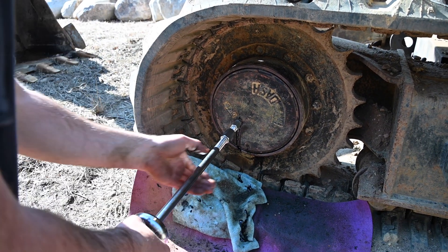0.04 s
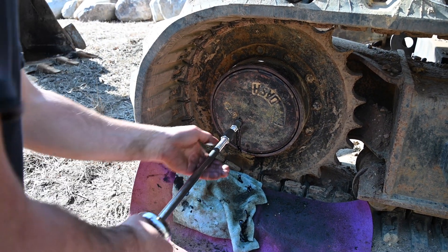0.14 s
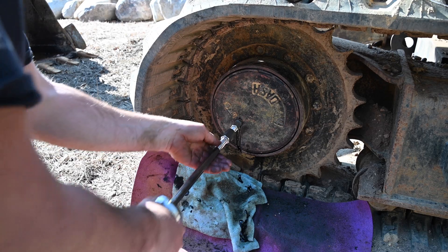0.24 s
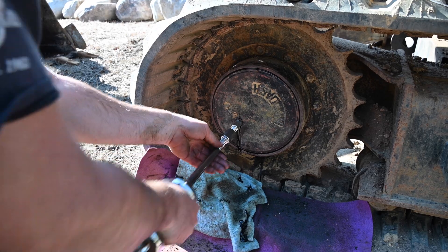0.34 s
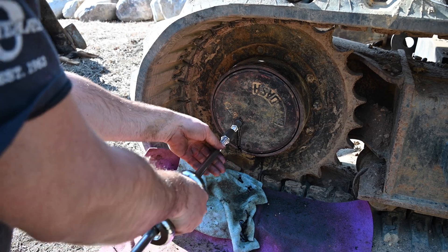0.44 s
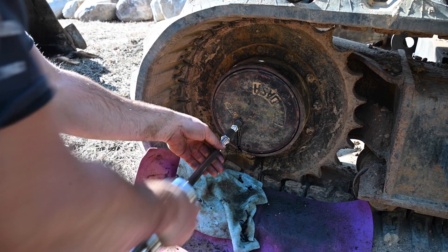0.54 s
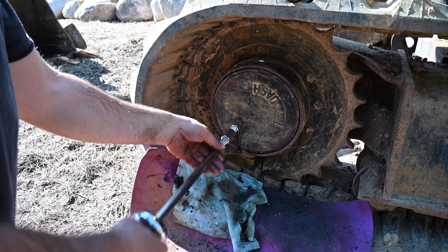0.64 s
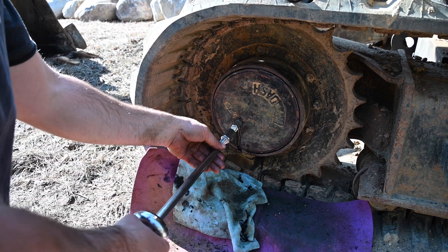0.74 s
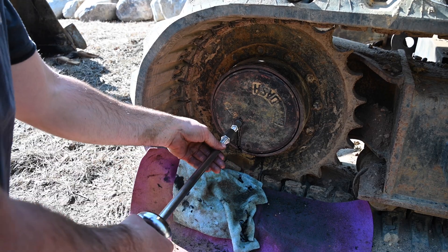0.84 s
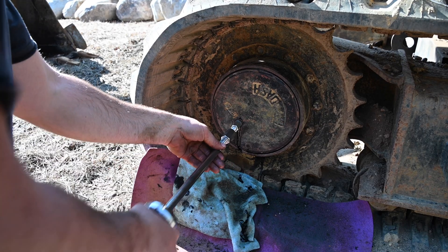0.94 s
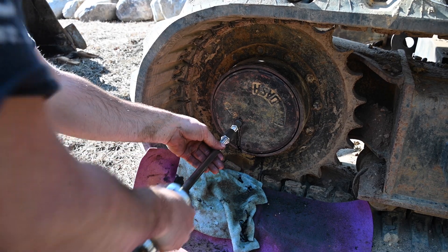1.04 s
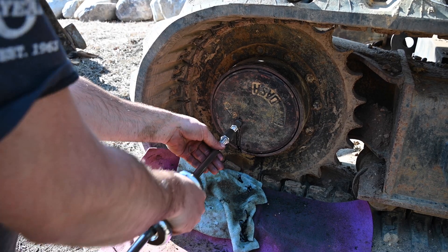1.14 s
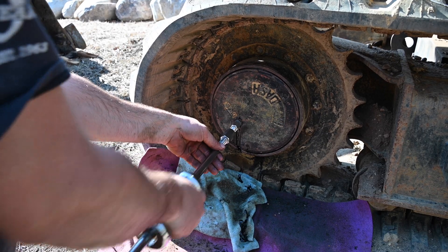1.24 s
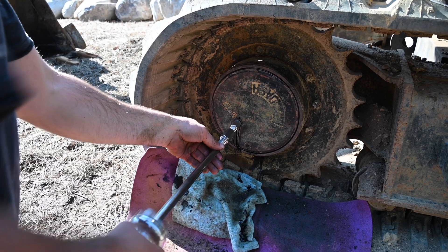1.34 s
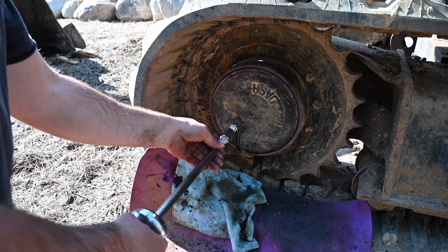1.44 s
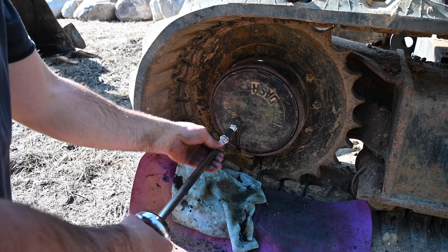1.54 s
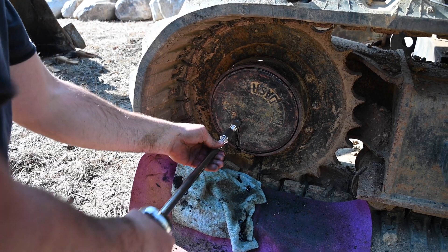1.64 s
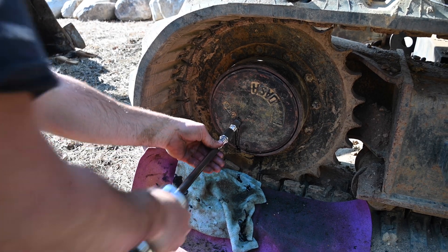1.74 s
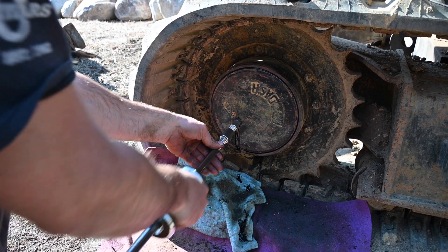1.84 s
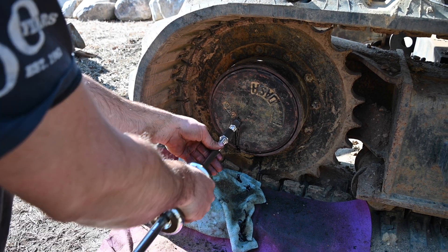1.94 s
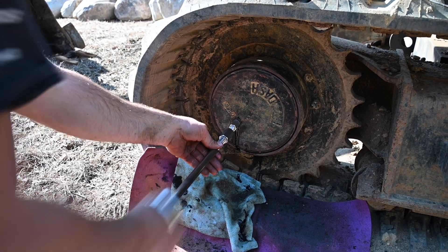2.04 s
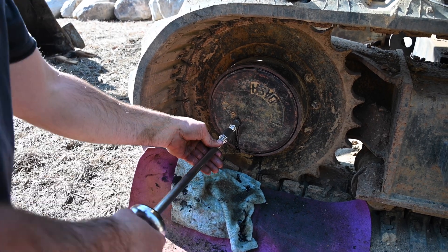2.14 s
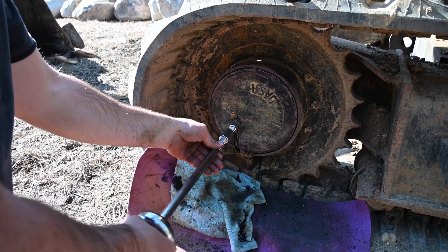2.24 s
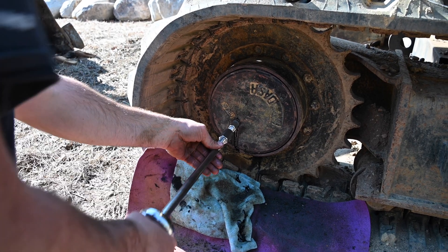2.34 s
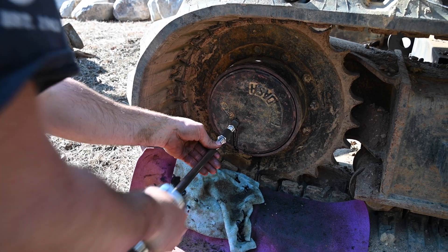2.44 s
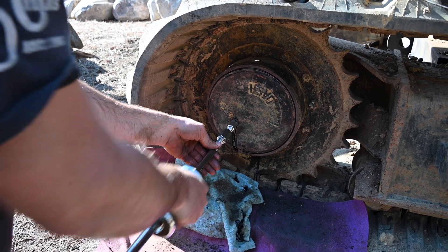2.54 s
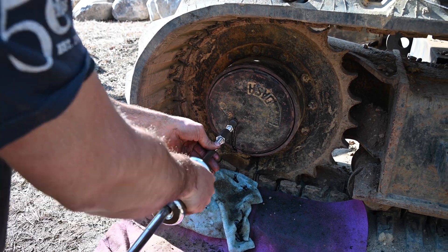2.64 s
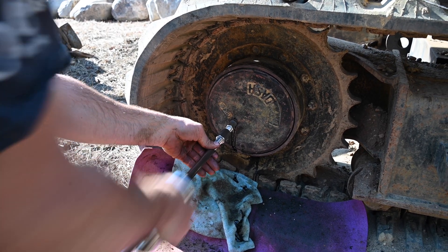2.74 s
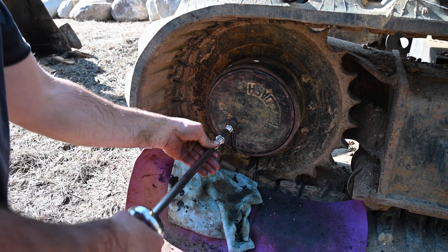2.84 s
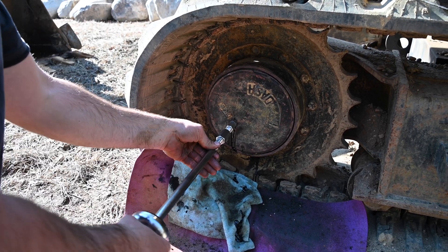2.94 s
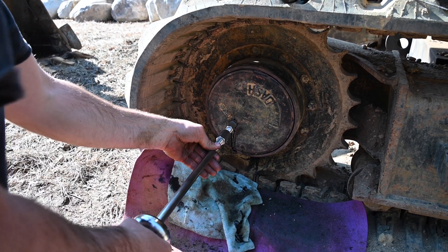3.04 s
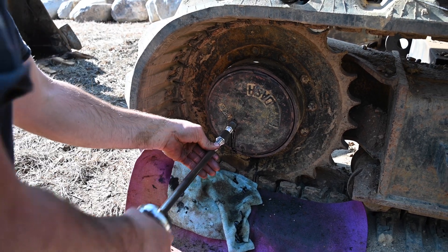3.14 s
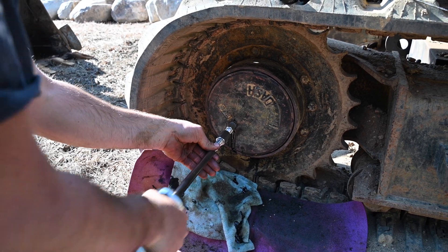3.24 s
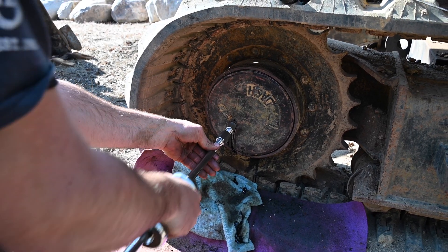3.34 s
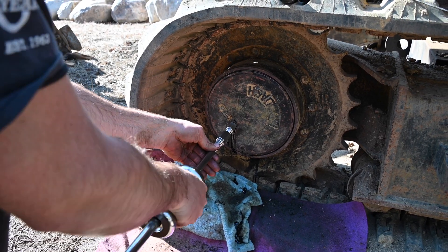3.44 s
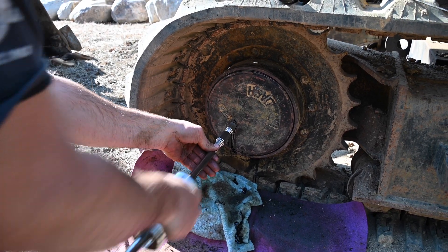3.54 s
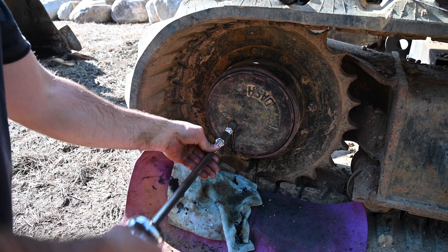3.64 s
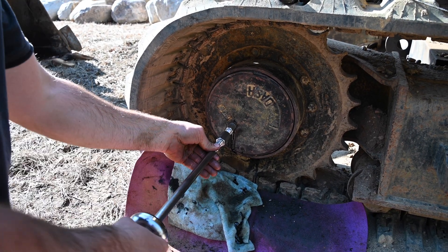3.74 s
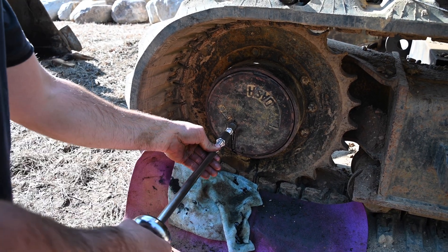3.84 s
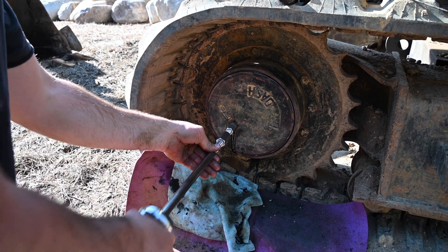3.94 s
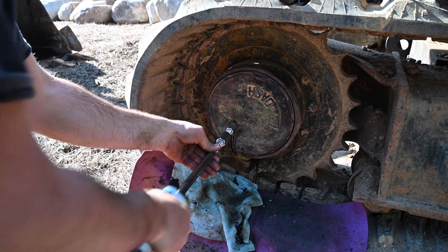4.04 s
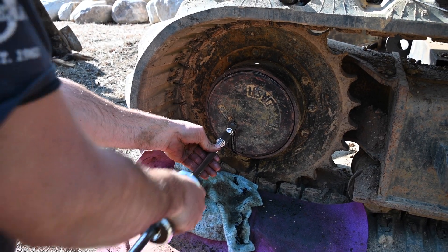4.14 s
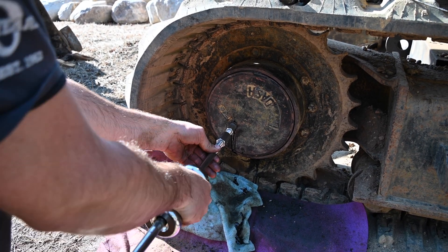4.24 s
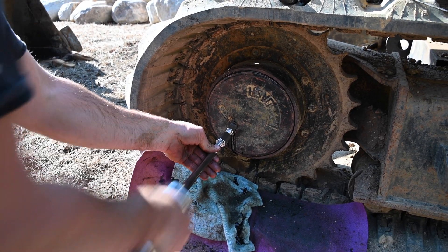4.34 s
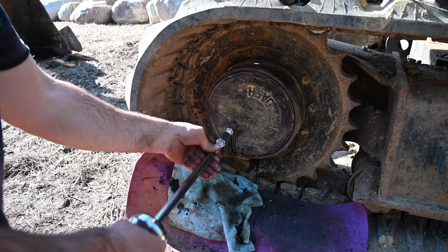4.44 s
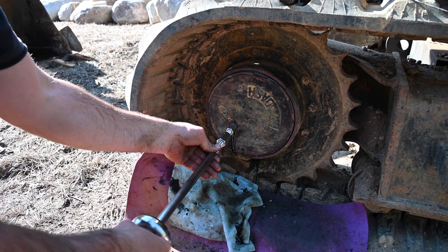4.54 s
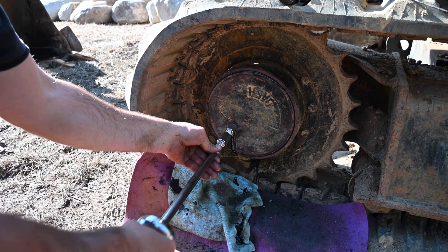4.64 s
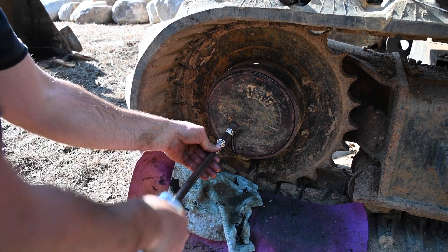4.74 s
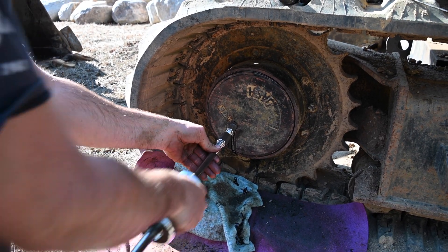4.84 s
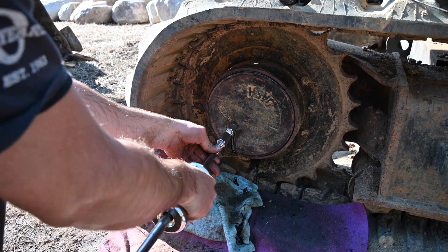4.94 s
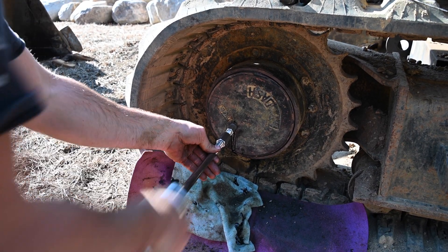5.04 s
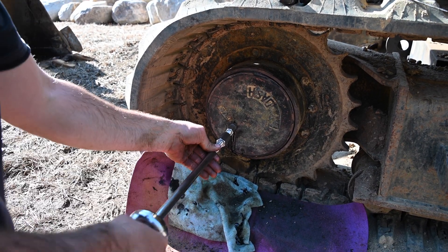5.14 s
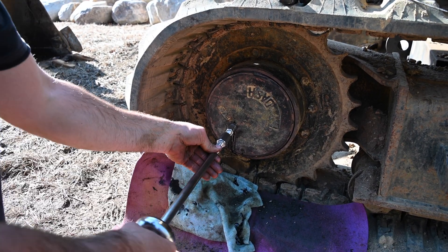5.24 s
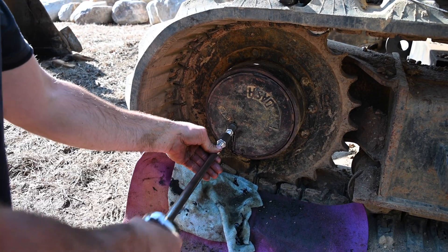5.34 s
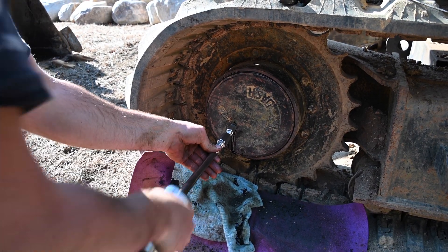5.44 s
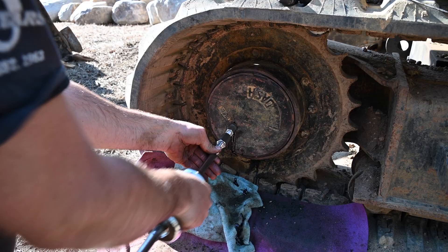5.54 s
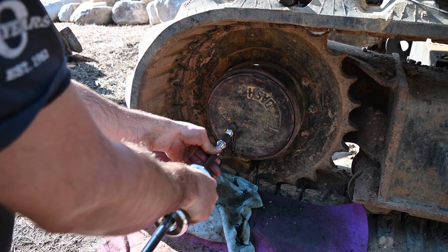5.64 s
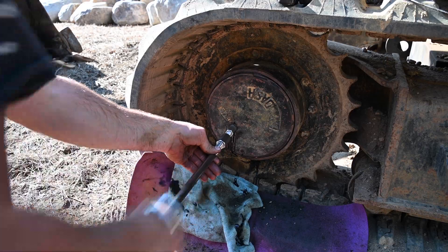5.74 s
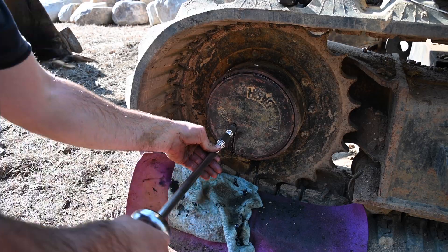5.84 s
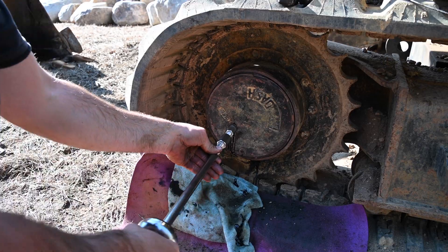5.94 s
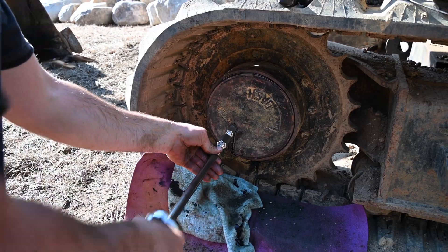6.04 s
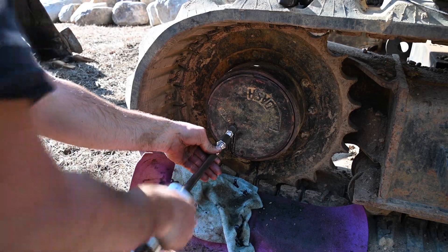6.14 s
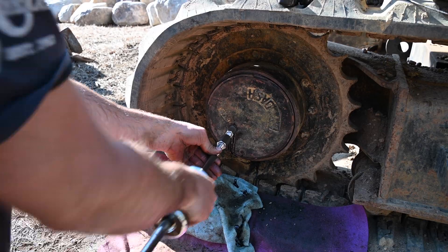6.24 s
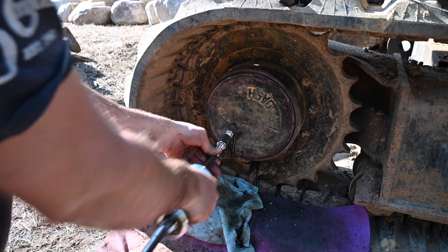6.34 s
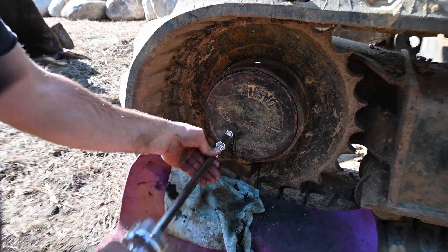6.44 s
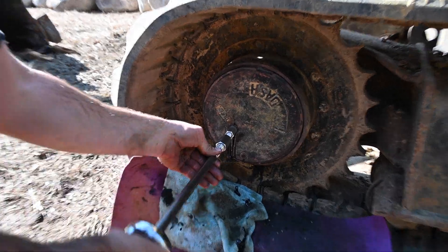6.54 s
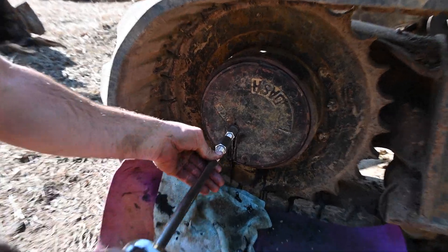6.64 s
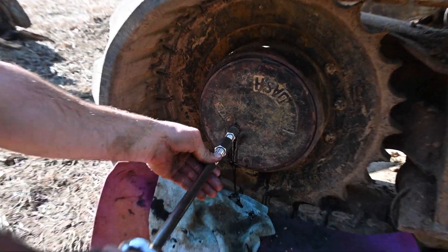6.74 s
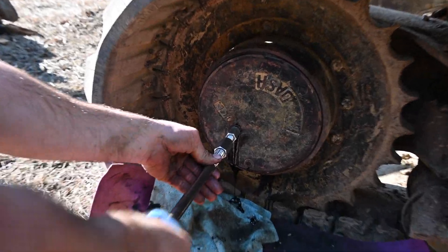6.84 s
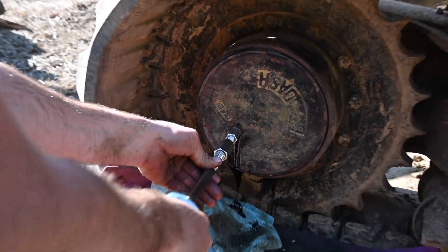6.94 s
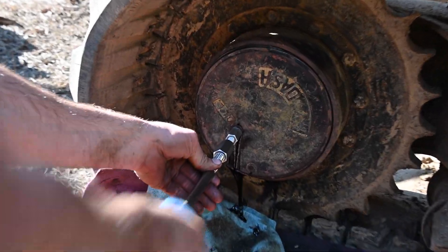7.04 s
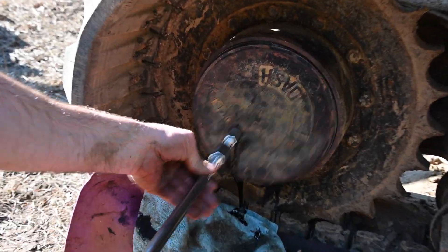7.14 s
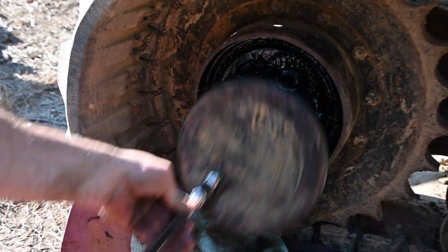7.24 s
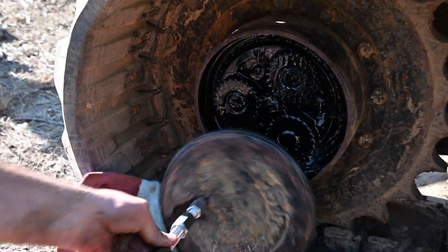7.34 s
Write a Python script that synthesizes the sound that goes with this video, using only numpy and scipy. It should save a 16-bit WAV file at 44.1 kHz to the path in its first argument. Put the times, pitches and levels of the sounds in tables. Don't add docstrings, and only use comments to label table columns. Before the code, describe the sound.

Ten hard metallic clanks about every 0.7 seconds, with sliding scrapes and light ticks between, over faint wind and low yard hum.

```python
import sys
import numpy as np
from scipy import signal
from scipy.fft import rfft, irfft, next_fast_len
from scipy.io import wavfile
from scipy.ndimage import uniform_filter1d, map_coordinates

SR = 44100
rng = np.random.default_rng(int(sys.argv[2]) if len(sys.argv) > 2 else 0)


def unload_wav(signal):
    wavfile.write(
        sys.argv[1],
        SR,
        np.round(np.clip(np.atleast_2d(signal).T, -1, 1) * 32767).astype(np.int16),
    )


def how_loud(loudness_db):
    steps = np.asarray(loudness_db, float) / 20
    return 10 ** steps


N = 326643
T = np.arange(N) / SR

# [start_s, level_db]
WIND = [(0, -44), (.36, -40), (.6, -48), (1.1, -42), (1.44, -51), (1.72, -40.5), (1.866, -33.5),
        (1.96, -41), (2.3, -41), (2.43, -40), (2.82, -47.5), (3.35, -46), (3.6, -44), (4.6, -50),
        (5.9, -48.5), (6.05, -47.5), (6.95, -46), (7.2, -50)]
# [freq_hz, density_db_per_hz]
GUST = [(12, -42.5), (20, -5), (75, 6), (189, -15.5), (259, -7.5), (312, -15.5), (600, -20), (780, -63.5),
        (1320, -120)]
# [freq_hz, density_db_per_hz]
YARD = [(65, -17), (110, 0), (352, -6), (552, -6), (599, -6.5), (766, -4), (2040, -16), (3010, -18),
        (12600, -39), (14500, -75)]
# [freq_hz, correlation_ratio]
ALIKE = [(60, 1), (180, 0.99), (550, 0.91), (1650, 0.5), (4970, 0.064), (15000, 0.33)]
# [freq_hz, level_db]
LEAN = [(250, -0.7), (700, 3.5), (1400, -0.5), (2800, -3), (5600, 1.1), (10000, 1), (15000, 1.5)]
# [freq_hz, phase_rad]
SKEW = [(100, 0.17), (700, 0.099), (1500, 1.1), (3000, 1.25), (6000, 1.81), (12000, 1.9)]
# [start_s, peak_db, low_pitch_hz, high_pitch_hz, brightness_db]
KNOCKS = [(0.0004, -23, 5300, 3600, -5), (.0205, -18, 900, 1800, -20), (0.599, -12, 1886, 5200, -26),
          (0.6387, -21.5, 1600, 3700, -40), (0.6808, -20.5, 2303, 4180, -35),
          (2.1575, -5.5, 1800, 5230, -6), (2.768, -5, 3240, 4800, -4), (2.8807, -6, 1790, 5600, 1),
          (3.055, -23, 2020, 3480, 3.5), (3.099, -23.5, 1530, 3430, 2), (3.269, -16, 1593, 3630, 6),
          (3.342, -12.5, 2280, 3500, -18), (3.3548, -19, 1023, 5530, -14), (3.7175, -8, 4700, 3200, -8),
          (4.161, -29, 2800, 5050, -20), (4.169, -22, 950, 1850, -20), (4.485, -12.5, 2450, 5300, -12),
          (4.9968, -16, 2240, 4000, -30), (5.0517, -5.5, 3400, 5200, -16), (5.0642, -10.5, 1336, 3450, -21),
          (5.5755, -7, 1870, 4100, -25), (5.5818, -7, 2280, 5440, -27), (5.7264, -8.5, 3400, 6400, -8),
          (6.52, -14, 2300, 4490, -30), (6.7724, -10, 2730, 5400, -9), (6.832, -31, 2500, 5000, -3),
          (6.9119, -8, 5150, 6500, -11), (7.2405, 1, 830, 5000, -5), (7.2458, 2, 980, 1670, -9),
          (7.2525, 2, 1680, 1100, -8), (7.2798, -2, 2390, 5450, -14)]
# [start_s, peak_db, low_pitch_hz, high_pitch_hz]
GLANCES = [(1.935, -26, 2900, 2200), (1.4021, -16, 1950, 4070), (1.8374, -30.5, 1640, 3930),
           (2.545, -23, 2510, 4650), (2.619, -27, 1900, 5140), (2.691, -17, 2080, 3930),
           (2.8474, -24.5, 1750, 5300), (3.3053, -26, 1200, 5070), (3.2475, -25, 3600, 7000),
           (4.4526, -20, 1350, 2350), (4.478, -18, 1010, 4330), (4.8737, -20, 2500, 3970),
           (5.8436, -13.5, 2180, 4390), (6.243, -27, 1640, 4450), (6.2695, -23, 2220, 4480),
           (6.4276, -20, 2366, 4030), (6.3895, -21, 2130, 5500), (6.4734, -21, 5200, 3600),
           (6.914, -8, 1454, 391), (7.043, -31, 3900, 4600), (7.2165, -9.5, 1540, 4600),
           (7.2645, 2, 4300, 5500)]
# [pitch_hz, width_hz, level_db]
ROD = [(990, 99, -8), (1640, 24, -12), (1802, 20, 1), (2210, 180, -5.5), (2700, 700, -8), (3300, 560, -11),
       (4110, 120, -3), (5214, 71, -3), (5530, 50, -8), (6450, 99, -2), (8300, 160, -18), (10160, 150, -17),
       (11520, 84, -16)]
# [freq_hz, density_db_per_hz]
CRACK = [(59, -35.5), (100, -6.5), (297, 1), (528, -11), (862, -5), (6000, -6), (7200, -15), (8500, -11),
         (10900, -17), (15400, -22), (16400, -34.5)]
# [freq_hz, density_db_per_hz]
RASP = [(880, -41), (1500, 2), (2490, -20), (3550, -6), (4730, -9), (6120, -2.5), (16000, -6.5)]
# [middle_s, half_length_s, scrape_db, rasp_db]
PUSHES = [(0.391, 0.12, -49.5, -57.5), (1.111, 0.092, -44, -61), (1.858, 0.13, -42.5, -62.5),
          (2.56, 0.11, -45.5, -70.5), (3.003, 0.089, -44, -40), (3.15, .1, -52, -48),
          (3.3, 0.25, -46.5, -45), (4.16, 0.093, -45.5, -63), (4.907, 0.057, -43, -61.5),
          (5.592, 0.12, -46, -66), (6.306, 0.12, -47.5, -69.5), (6.69, 0.027, -47.5, -60.5),
          (6.98, 0.091, -60, -58.5), (7.4, .06, -52, -61)]
# [middle_s, peak_db, pitch_hz]
LEFT_PUFFS = [(0.3177, -31, 109), (0.3558, -25, 204), (0.3852, -18, 124), (0.446, -26, 124),
              (0.4758, -17.5, 143), (1.2192, -27, 190), (1.2666, -24, 116), (1.7568, -13, 160),
              (1.7855, -18, 122), (1.8013, -24, 136), (1.8472, -12.5, 180), (1.8654, -12, 175),
              (1.896, -9, 234), (1.9112, -16.5, 119), (1.97, -23, 111), (1.9993, -19, 103),
              (2.015, -20, 130), (2.0834, -29, 126), (2.117, -23, 117), (2.4011, -10, 224)]
# [middle_s, peak_db, pitch_hz]
RIGHT_PUFFS = [
    (2.48, -16.5, 137),
    (2.5048, -23.9, 149),
    (6.8097, -22, 106),
    (6.944, -24, 252),
    (7.028, -25, 115),
    (7.2109, -18.5, 127),
]
# [start_s, level_db,
# pitch_hz, t60_s]
CATCHES = [(6.914, -19, 1480, .13), (.599, -25, 5200, .07), (6.52, -22, 4490, .09), (7.217, -20, 6400, .1),
           (.395, -39, 4150, .2), (.4, -39, 1900, .2), (.445, -40, 3900, .12), (.68, -32, 6450, .14),
           (.678, -33, 5500, .08), (.703, -32, 5650, .08), (.995, -38, 900, .1), (1.03, -41, 4050, .15),
           (1.063, -37, 4200, .16), (1.075, -37, 2250, .1), (1.085, -41, 6450, .15), (1.12, -38, 4050, .1),
           (1.155, -36, 4080, .14), (1.17, -37, 2230, .08), (1.236, -36, 1800, .06),
           (1.745, -42, 5150, .25), (1.79, -40, 6500, .2), (1.835, -33, 1700, .15), (1.85, -39, 5100, .2),
           (1.945, -37, 5100, .12), (2.132, -31, 5300, .15), (2.505, -39, 2250, .12), (2.53, -39, 4600, .1),
           (2.578, -39, 4050, .08), (2.615, -38, 2850, .08), (2.69, -34, 5250, .1), (3.352, -36, 5450, .15),
           (3.693, -30, 5400, .1), (3.705, -29, 5350, .1), (4.08, -40, 2120, .1), (4.108, -38, 2280, .14),
           (4.195, -39, 1850, .14), (4.169, -28, 950, .07), (4.89, -36, 1350, .08), (5.15, -30, 2250, .08),
           (5.155, -31, 4450, .15), (5.165, -30, 3400, .1), (5.17, -29, 2250, .07), (5.19, -14, 10650, .2),
           (5.54, -39, 2250, .1), (5.727, -24, 8050, .1), (5.728, -23, 5450, .11), (5.84, -32, 2250, .15),
           (7.268, -11, 7000, .07), (7.28, -8, 560, .05)]
# [start_s, peak_db, thump_db, clank_db, scrape_db]
BLOWS = [
    (0.7181, -4, -25.5, -28, -35.5),
    (1.446, -4, -19, -26, -37),
    (2.17, -4, -22, -12, -34.5),
    (2.8951, -2, -24, -42, -34.5),
    (3.727, -3.5, -22, -14, -31),
    (4.4978, -3, -19, -8.5, -30.5),
    (5.186, -3.5, -17, -9, -25.5),
    (5.8733, -2.5, -21.5, -12, -27),
    (6.552, -1, -22, -11.5, -28.5),
    (7.234, -1, -23, -4, -30),
]
# [low_hz, middle_hz, high_hz, tick_db]
FAVOURED = [(724, 1820, 4880, 2), (1010, 1780, 4890, 2), (727, 1550, 5180, -4), (738, 2490, 5340, 0),
            (797, 2680, 5420, -6), (966, 1770, 4240, -4), (945, 1860, 5350, 2), (740, 2610, 5360, 0),
            (807, 2630, 5400, 0), (829, 2440, 4760, -3)]
# [pitch_hz, level_db, t60_s]
STEEL = [(892, -5, 0.013), (1815, 1, 0.097), (2610, -3.5, 0.067), (2685, 5, 0.032), (3050, -7.5, 0.042),
         (3850, -18.5, 0.075), (4380, 11, 0.028), (4940, 2, 0.06), (5380, 6, 0.036), (7300, -30.5, 0.045),
         (8080, -43, 0.088), (8430, 3, 0.046), (10610, 4, 0.075), (11960, -22.5, 0.055)]
# [pitch_hz, level_db, t60_s]
COVER = [(156, -8.5, 0.44), (238, -4.5, 0.1), (265, 0, 0.17), (292, 3.5, 0.15), (412, -9, 0.11)]
# [pitch_hz, level_db, t60_s]
RIM = [(618, -17.5, 0.017), (760, -5, 0.07), (830, -3, 0.057), (988, -4.5, 0.064), (1080, -12, .06)]
# [freq_hz, t60_s]
ECHO = [(150, .5), (1000, 0.36), (4000, 0.16), (14000, 0.12)]
# [start_s, level_db, t60_s]
SINGING = [
    (.99, -47, .5),
    (1.19, -45, .6),
    (2.55, -48, .8),
    (2.7, -39, .6),
    (2.845, -37, .4),
    (5.58, -41.5, 1),
    (5.74, -41, 1),
]
# [start_s, pitch_hz, level_db]
SQUEAK = [
    (7.115, 2600, -72),
    (7.13, 2700, -39),
    (7.155, 2950, -42),
    (7.175, 3700, -31),
    (7.195, 4600, -30),
    (7.215, 4800, -55),
]
# [start_s, duck_db]
DUCKS = [
    (-.025, 15),
    (2.766, 8),
    (5.05, 7.5),
    (5.726, 10.5),
    (6.42, 0),
    (6.913, -1.5),
]


def unit(x):
    return x / np.sqrt(np.mean(x ** 2) + 1e-20)


def along(points, hz):
    f, v = np.transpose(points)
    return np.interp(np.log(hz + 1), np.log(f + 1), v)


def curves(rows):
    s, *cols = np.transpose(rows)
    return [np.interp(T, s, c) for c in cols]


def wobble(rate):
    return map_coordinates(rng.standard_normal(int(N * rate / SR) + 4), [T * rate])


def filtered(x, response):
    m = next_fast_len(x.shape[-1] + 8192)
    hz = np.fft.rfftfreq(m, 1 / SR)
    return irfft(rfft(x, m) * response(hz), m)[..., :x.shape[-1]]


def rush(spectrum, alike):
    def mid_side(hz):
        turn = np.arccos(np.clip(along(alike, hz), -1, 1)) / 2
        return how_loud(along(spectrum, hz)) * [np.cos(turn), np.sin(turn)]
    mid, side = filtered(rng.standard_normal((2, N)), mid_side)
    return unit(np.array([mid + side, mid - side]))


def ports(x):
    knots = rng.standard_normal(40)

    def response(hz):
        lean_db = along(LEAN, hz)
        skew = along(SKEW, hz) * map_coordinates(knots, [hz / 700])
        return np.array([how_loud(k * lean_db) * np.exp(k * 1j * skew) for k in (.5, -.5)])
    return filtered(x, response)


def ring(modes, t, longer, scatter_db, blur):
    hz, db, t60 = np.transpose(modes)[:, :, None]
    luck = rng.standard_normal((len(modes), 3))
    walk = np.cumsum(rng.standard_normal((len(modes), len(t))), axis=1) * np.sqrt(blur * hz / SR)
    phase = 2 * np.pi * hz * (1 + 0.0062 * luck[:, :1]) * t + luck[:, 1:2] + walk
    level = how_loud(db + scatter_db * luck[:, 2:] - 60 * t / (longer * t60))
    return np.sum(level * np.sin(phase), axis=0)


def burst(t, tilt_db):
    colour = lambda hz: how_loud(along(CRACK, hz) + tilt_db / (1 + (6000 / (hz + 1)) ** 4))
    return unit(filtered(rng.standard_normal((3, len(t))), colour))


def add(track, s, sound):
    track[:, round(s * SR):][:, :sound.shape[-1]] += sound


def spread(noise, wide):
    return ports(noise[0]) + wide * noise[1:]


def wind():
    wind_db, = curves(WIND)
    lumps = how_loud(2.5 * wobble(25) + 3.7 * np.array([wobble(33), wobble(22)]))
    noise = rush(GUST, [(40, 0), (120, 0.6), (300, 0.97)])
    return how_loud(wind_db + [[5], [0]]) * unit(lumps * noise)


def yard_hum():
    hum_db = -43.5 + 0.8258 * T
    return how_loud(hum_db + 0.49 * wobble(16)) * rush(YARD, ALIKE)


def whine():
    phase = 2 * np.pi * 15704.5 * T + np.array([[.36], [-.36]])
    return how_loud(-54 + .7 * wobble(25)) * np.sin(phase) * np.sqrt(2)


def taps():
    knock_t60_s, glance_t60_s, glance_bright_db = .044, .065, -21
    out, t = np.zeros((2, N + SR)), np.arange(SR // 5) / SR
    rows = [(*r, knock_t60_s) for r in KNOCKS]
    rows += [(*r, glance_bright_db, glance_t60_s) for r in GLANCES]
    for s, db, low_hz, high_hz, bright_db, t60 in rows:
        rod = [(hz, level - 7.5, t60) for hz, _, level in ROD]
        rod += [(low_hz, 3, 1.1 * t60), (high_hz, 1, 1.1 * t60)]
        thin = filtered(burst(t, bright_db + 7.0), lambda hz: 1 / (1 + (0.53 * low_hz / (hz + 1)) ** 4))
        attack_s = 0.00013 + 6 * t60 ** 3 + .00005 * max(-12 - bright_db, 0)
        click = how_loud(0.53 * bright_db + 1.0 - 60 * t / 0.0058)
        shape = how_loud(-10 - 60 * t / t60) + click
        hit = shape * spread(thin, wide=0.81)
        hit += how_loud(-13.5) * ports(ring(rod, t, longer=.9, scatter_db=3, blur=0.07))
        swell = 1 - np.exp(-t / attack_s)
        add(out, max(s - .0003, 0), how_loud(db) * how_loud([[-.8], [.8]]) * swell * hit)
    return out[:, :N]


REST_S, RESUME_S = 0.035, 0.073


def moving():
    return np.prod([np.interp(T - b[0], [0, .03, REST_S, RESUME_S], [1, 0, 0, 1]) for b in BLOWS], axis=0)


def strokes():
    push_fade_db, pull_db_per_s, pull_rasp_db = 10, 182.5, -18
    scrape, rasp = how_loud(-61) ** 2, how_loud(-65) ** 2
    for s, half, scrape_db, rasp_db in PUSHES:
        swell = how_loud(-push_fade_db * ((T - s) / half) ** 2) ** 2
        scrape = scrape + how_loud(scrape_db) ** 2 * swell
        rasp = rasp + how_loud(rasp_db) ** 2 * swell
    for s, *_, pull_db in BLOWS:
        pull = (T < s + REST_S) * how_loud(pull_db - pull_db_per_s * np.maximum(s - T, 0)) ** 2
        scrape = scrape + pull
        rasp = rasp + how_loud(pull_rasp_db) ** 2 * pull
    return 10 * np.log10(scrape), 10 * np.log10(rasp)


def flecks(count):
    start, pitch, cycles, size = rng.random((count, 4)).T
    hz = 1500 * 4.2 ** pitch[:, None]
    t = np.arange(700) / SR
    level = how_loud(-3 * np.log(size[:, None] + 1e-4))
    decay = np.exp(-hz * t / (6 + 18 * cycles[:, None]))
    ping = level * np.sin(2 * np.pi * hz * t) * decay * (1 - np.exp(-t / .001))
    at = (start[:, None] * N).astype(int) + np.arange(len(t))
    return unit(np.bincount(at.ravel(), (ping * 2000 / hz).ravel(), N + len(t))[:N])


def rod_response(f):
    total = 0.14 * how_loud(along(CRACK, f)) / (1 + (f / 12500) ** 8)
    for k, (hz, width, db) in enumerate(ROD):
        total = total + (-1) ** k * how_loud(db) * 1j * f * width / (hz * hz - f * f + 1j * f * width)
    return total


def slide(scrape_db, rasp_db):
    grit = rng.standard_normal(N) * how_loud(2.5 * wobble(70) + 2 * wobble(400))
    _, _, z = signal.stft(grit, SR, nperseg=512)
    patches = uniform_filter1d(uniform_filter1d(rng.standard_normal(z.shape), 5, 0), 5, 1)
    grit = signal.istft(z * how_loud(4.3 * unit(patches)), SR, nperseg=512)[1][:N]
    grains = unit(filtered(grit, rod_response)) + 0.6 * flecks(count=5000)
    scrape = how_loud(scrape_db + 3) * ports(grains) * how_loud([[-1.2], [1.2]])
    rasp = how_loud(rasp_db + 9 + 2.2 * wobble(40)) * rush(RASP, [(1000, 0.76), (8000, 0.059)])
    dull = filtered(rasp, lambda hz: 1 / (1 + (hz / 12500) ** 12))
    hardness = np.clip((rasp_db + 58.5) / 8, 0, 1)
    return moving() * (scrape + dull + hardness * (rasp - dull))


def puffs():
    shelter_db = 30
    out, t = np.zeros((2, N + SR)), np.arange(-700, 700) / SR
    for table, ports_db in ((LEFT_PUFFS, [[0], [-shelter_db]]), (RIGHT_PUFFS, [[-shelter_db], [0]])):
        for s, db, hz in table:
            u = 2 * np.pi * hz * t
            add(out, s + t[0], how_loud(db) * how_loud(ports_db) * -np.sin(u) * np.exp(-(u / 2.97) ** 2))
    return out[:, :N]


def catches():
    out, t = np.zeros((2, N + SR)), np.arange(SR // 8) / SR
    for s, db, hz, t60 in CATCHES:
        mode = ring([(hz, 0, t60)], t, longer=1, scatter_db=0, blur=.05)
        add(out, s, how_loud(db) * (1 - np.exp(-t / .003)) * ports(mode))
    return out[:, :N]


def echo(x):
    hz, t, z = signal.stft(rng.standard_normal((2, SR // 2)), SR, nperseg=256)
    tail = signal.istft(z * how_loud(-60 * t / along(ECHO, hz)[:, None]), SR, nperseg=256)[1]
    return signal.fftconvolve(x, tail / np.linalg.norm(tail[0]), axes=1)[:, :SR // 2]


def blows():
    crush_s = 0.0053
    out, t = np.zeros((2, N + SR)), np.arange(SR // 2) / SR
    after = np.maximum(t - crush_s, 0)
    rise = 1 - np.exp(-t / 0.0024)
    body = rise * (how_loud(-60 * after / 0.04) + how_loud(-17.5 - 60 * t / 0.56))
    snap = how_loud(-60 * t / .011) * (1 - np.exp(-t / .0001))
    for (s, db, thump_db, clank_db, _), (low_hz, middle_hz, high_hz, tick_db) in zip(BLOWS, FAVOURED):
        crack = how_loud(-3.5) * body * spread(burst(t, -7.5), wide=0.2)
        sizzle = how_loud(-12.5 - 60 * after / 0.02) * rise * spread(burst(t, 31.0), wide=0.34)
        tick = how_loud(tick_db) * snap * spread(burst(t, 14.5), wide=.4)
        favoured = [(low_hz, -4, .06), (middle_hz, 4, .045), (high_hz, 6, .045)]
        steel = how_loud(-10) * rise * ring(STEEL, t, longer=0.89, scatter_db=3, blur=.03)
        steel += how_loud(-10) * rise * ring(favoured, t, longer=1, scatter_db=0, blur=.05)
        thump = ring(COVER, t, longer=1.8, scatter_db=1.0, blur=0.14)
        cover = how_loud(thump_db + 3.5) * (1 - np.exp(-t / 0.0018)) * thump
        cover += how_loud(clank_db + 2.5) * rise * ring(RIM, t, longer=1.86, scatter_db=3.0, blur=0.11)
        hit = crack + sizzle + tick + (1 - np.exp(-t / 0.000067)) * ports(steel + cover)
        add(out, s + .0004, how_loud(db) * (hit + how_loud(-25.0) * echo(hit[:, :SR // 10])))
    return out[:, :N]


def singing():
    level = 0
    for s, db, t60 in SINGING:
        t = np.maximum(T - s, 0)
        level = level + how_loud(db - 60 * t / t60) * (1 - np.exp(-t / .01)) * (t < .45)
    tone = np.sin(2 * np.pi * 1790 * T + 1.2 * wobble(50))
    return moving() * ports(level * how_loud(5 * wobble(60)) * tone)


def squeak():
    hz, db = curves(SQUEAK)
    on = (T > SQUEAK[0][0]) & (T < SQUEAK[-1][0])
    phase = 2 * np.pi * np.cumsum(hz * (1 + 0.05 * wobble(900))) / SR
    return ports(on * how_loud(db - 3 + 5 * wobble(200)) * np.sin(phase))


def scene():
    outdoors = wind() + yard_hum() + whine() + puffs()
    weight = taps() + slide(*strokes()) + catches()
    return outdoors + weight + blows() + singing() + squeak()


def gain_control():
    db = np.zeros(N)
    for s, depth_db in [(b[0], 28.5) for b in BLOWS] + DUCKS:
        t = np.maximum(T - s, 0)
        fall = np.clip(t / 0.062, 0, 1) ** 0.6
        recovery = np.exp(-np.maximum(t - .065, 0) / 0.078)
        db = np.minimum(db, -depth_db * fall * recovery)
    return how_loud(db)


def top_cut(x):
    return signal.sosfilt(signal.butter(12, 16520, fs=SR, output="sos"), x)


def record(dry):
    x = dry * gain_control()
    x = x / (1 + np.abs(x / 0.8) ** 8) ** (1 / 8)
    x = filtered(x, lambda hz: np.interp(hz, [15900, 16500, 16600], [1, .1, .004]))
    return top_cut(x)


dry = scene()
out = record(dry)
unload_wav(out)
```